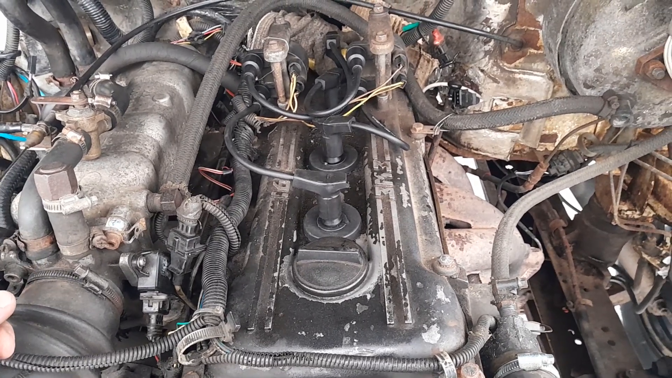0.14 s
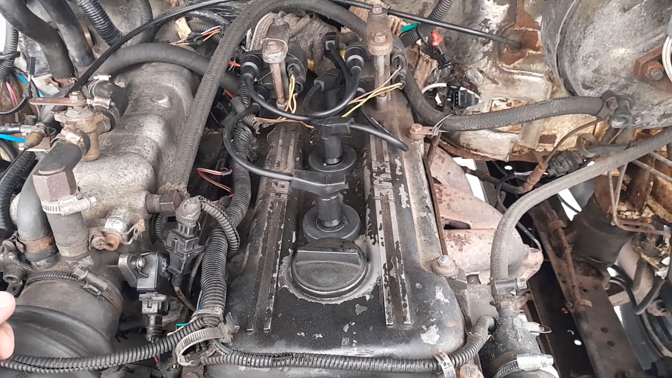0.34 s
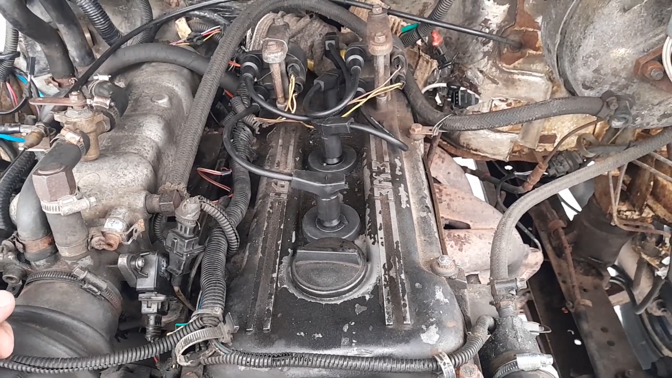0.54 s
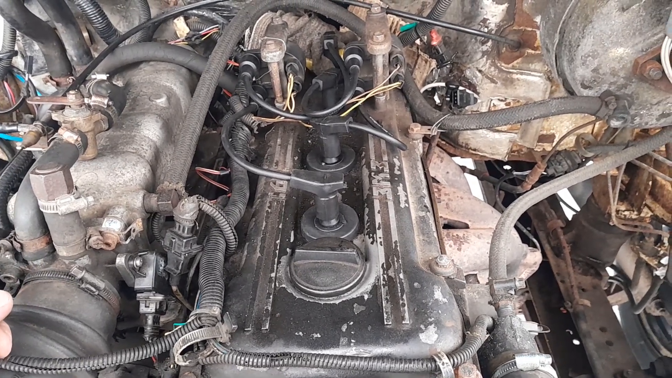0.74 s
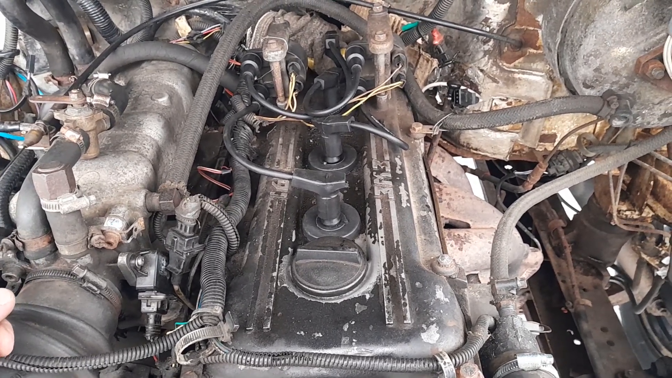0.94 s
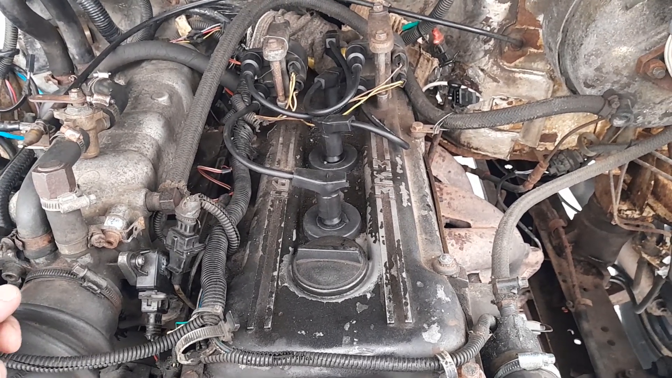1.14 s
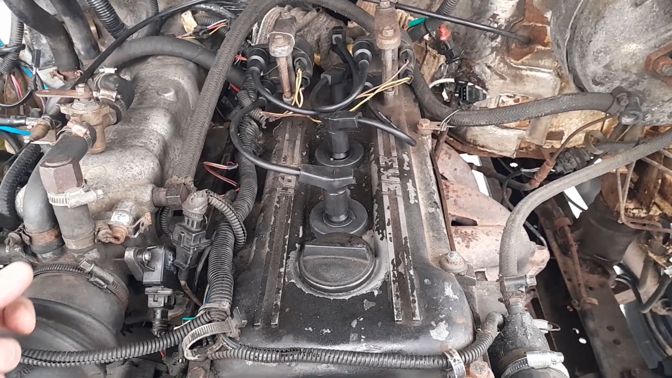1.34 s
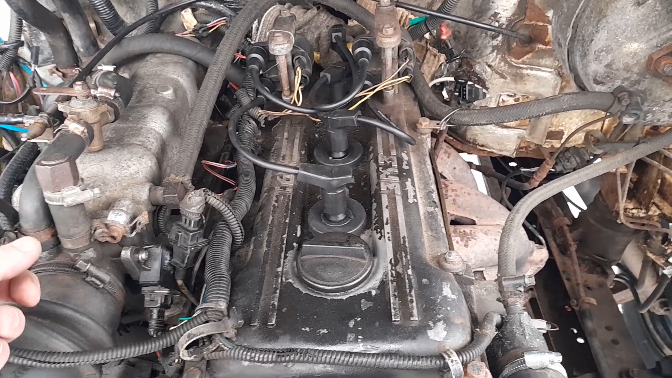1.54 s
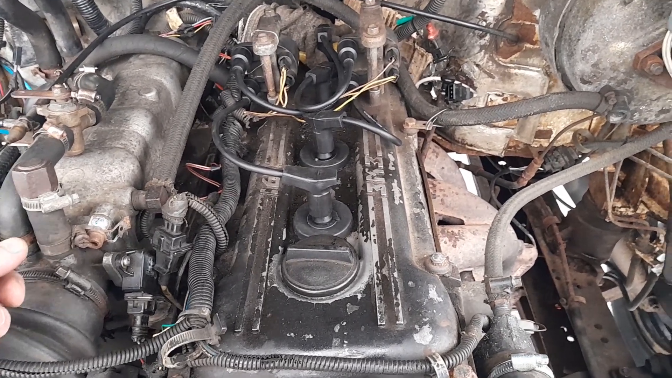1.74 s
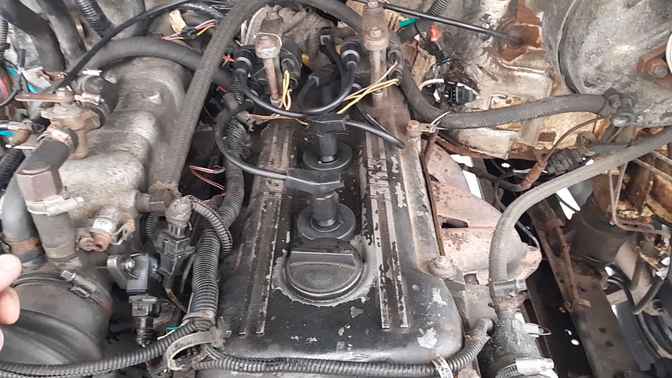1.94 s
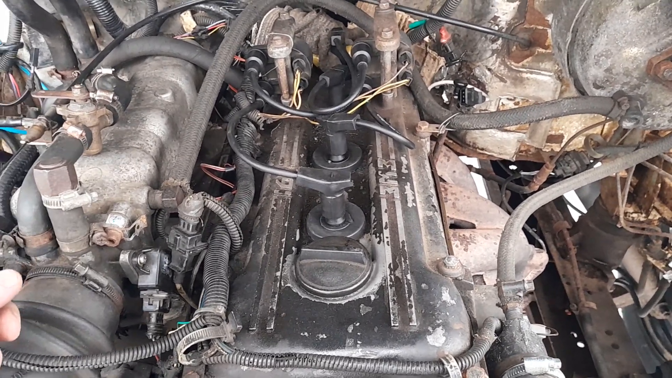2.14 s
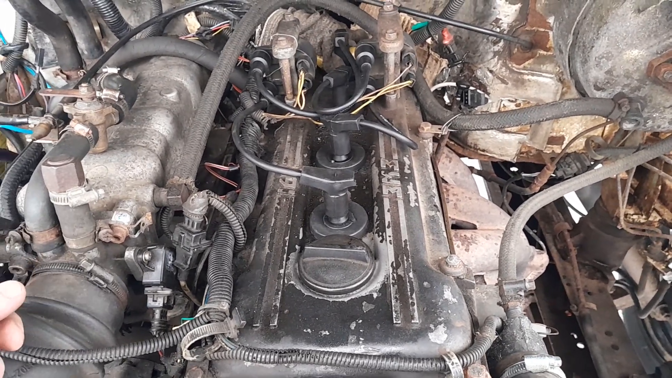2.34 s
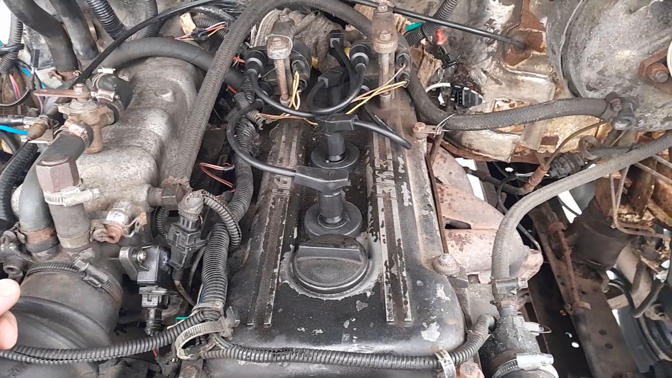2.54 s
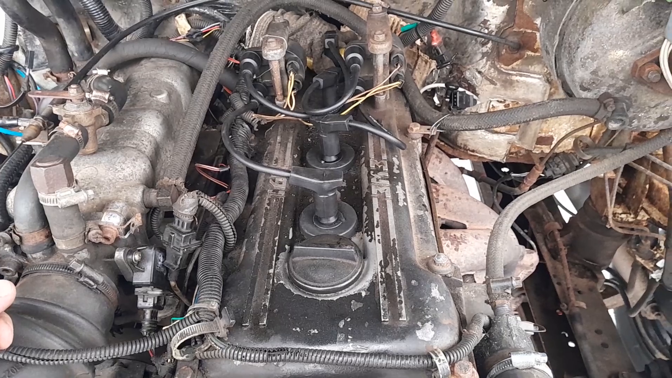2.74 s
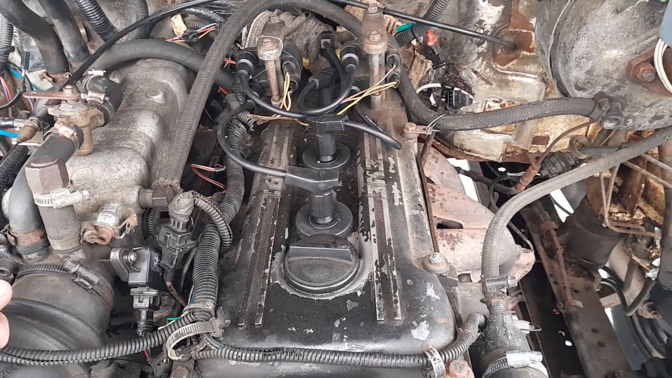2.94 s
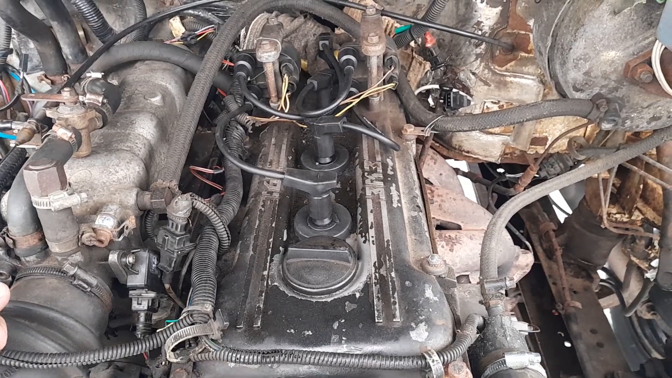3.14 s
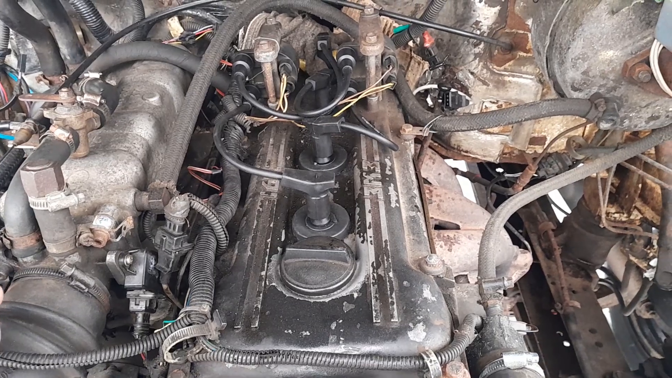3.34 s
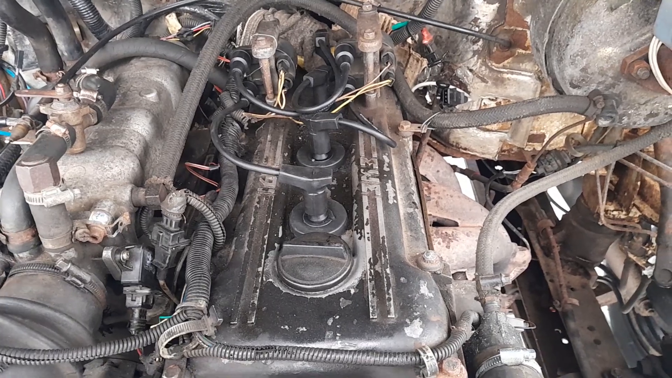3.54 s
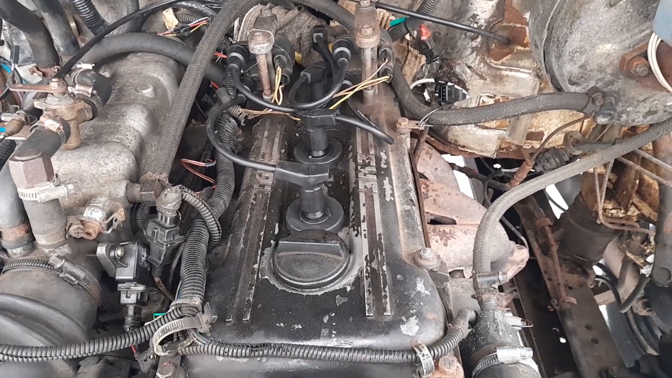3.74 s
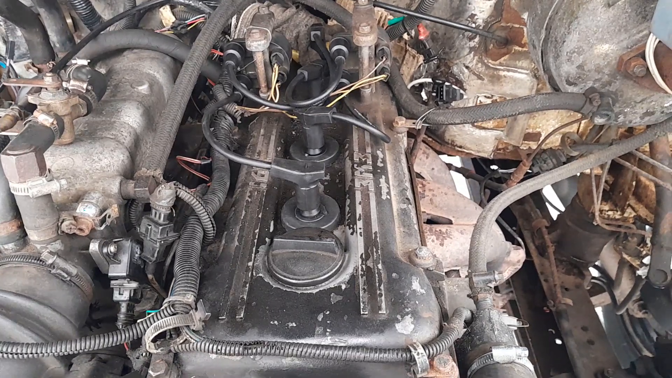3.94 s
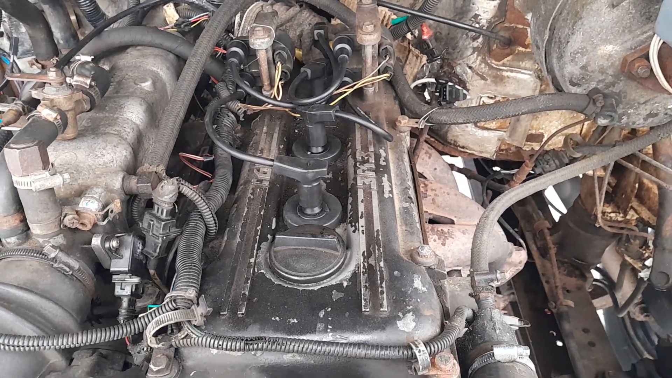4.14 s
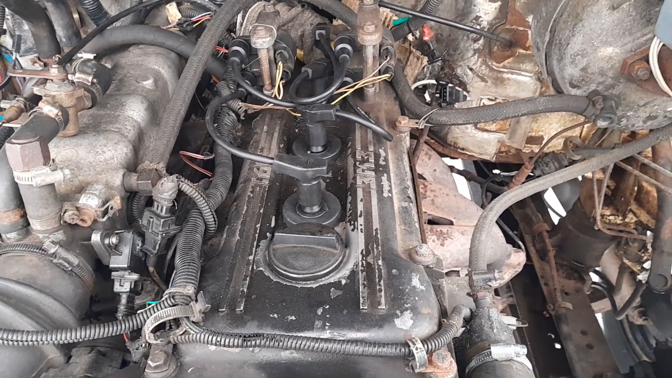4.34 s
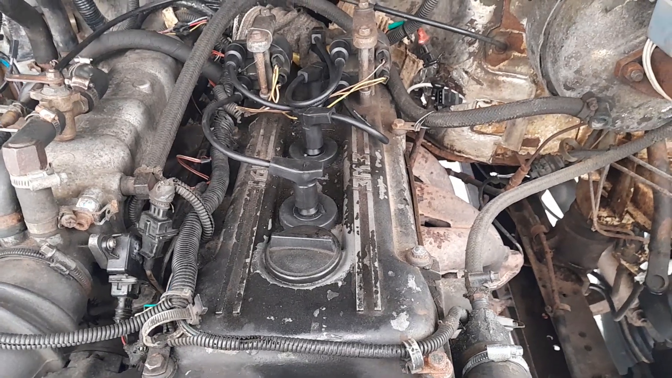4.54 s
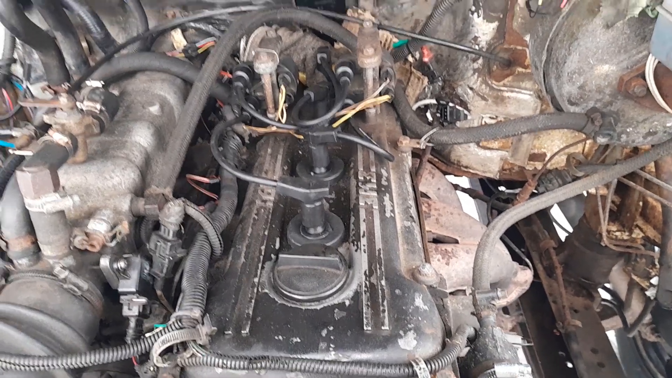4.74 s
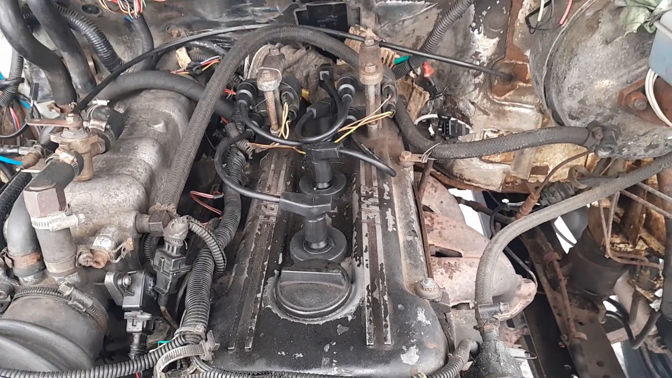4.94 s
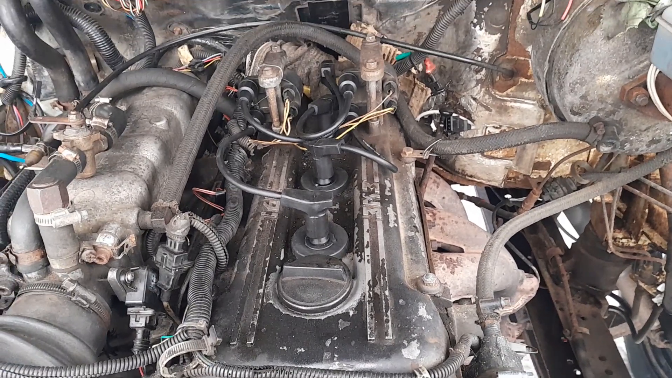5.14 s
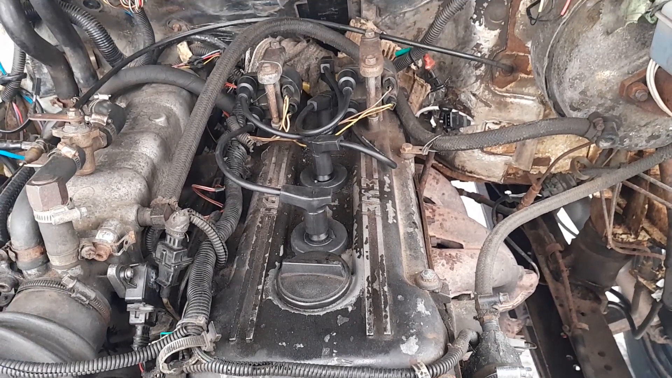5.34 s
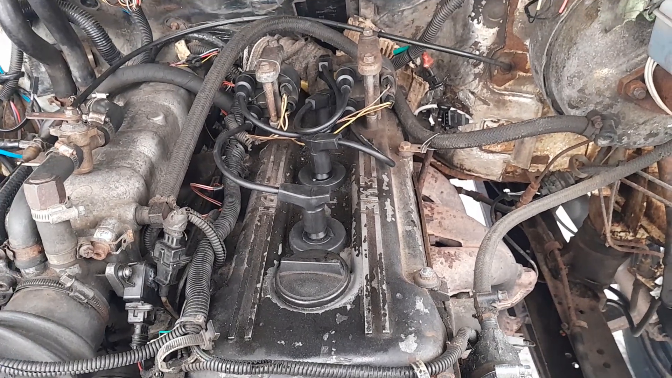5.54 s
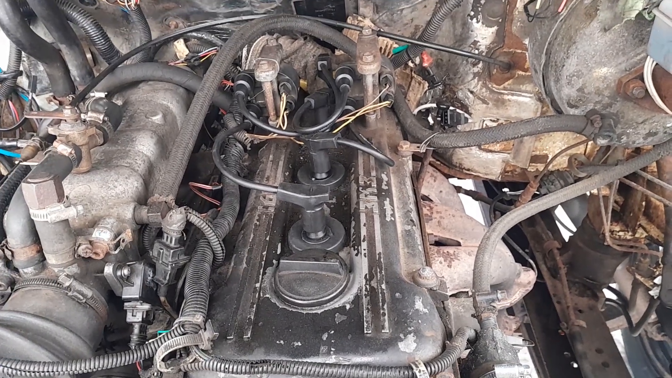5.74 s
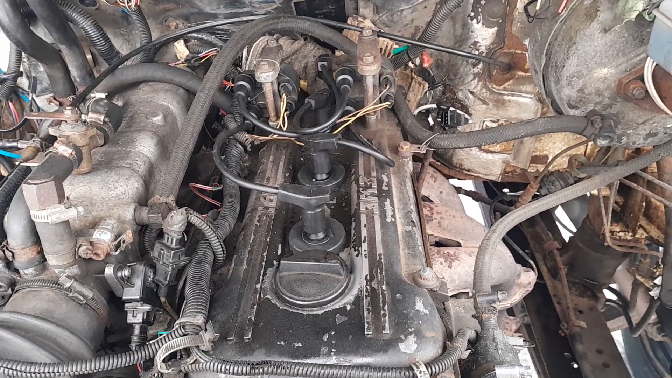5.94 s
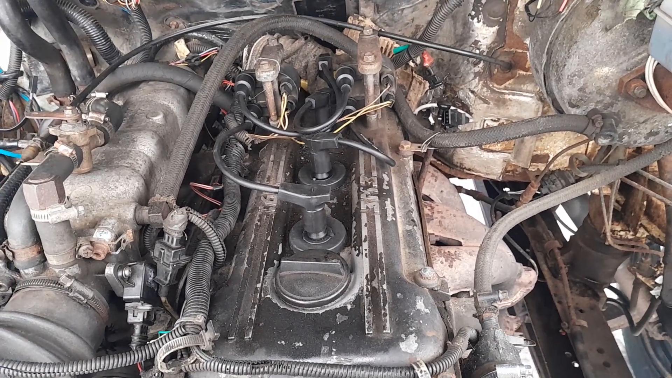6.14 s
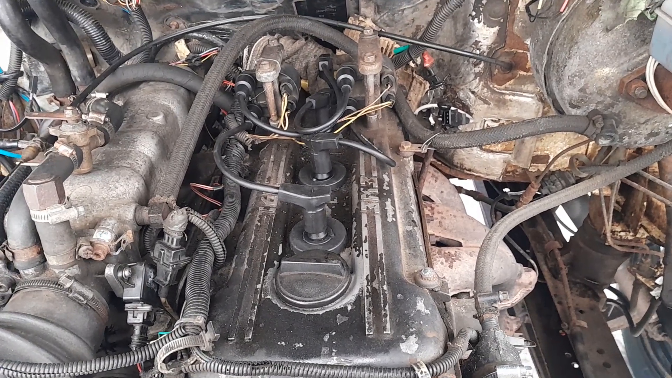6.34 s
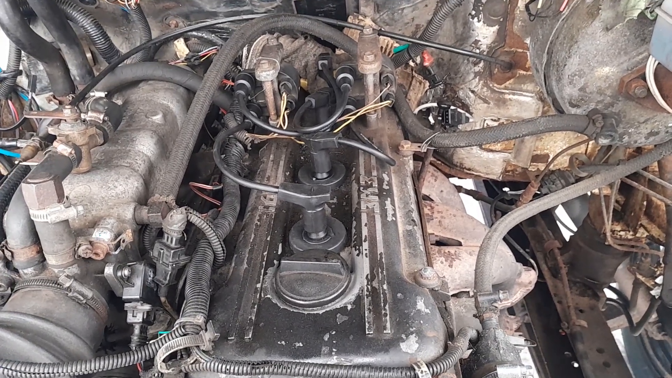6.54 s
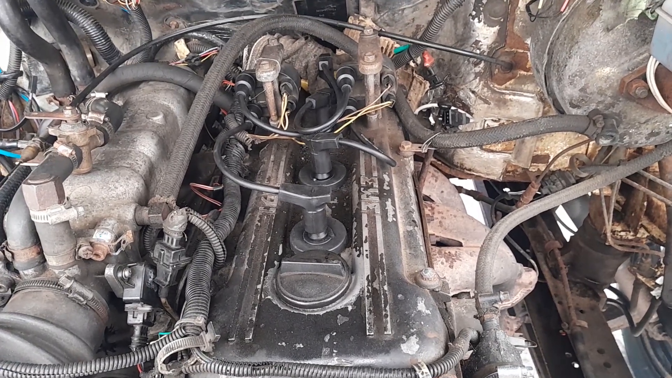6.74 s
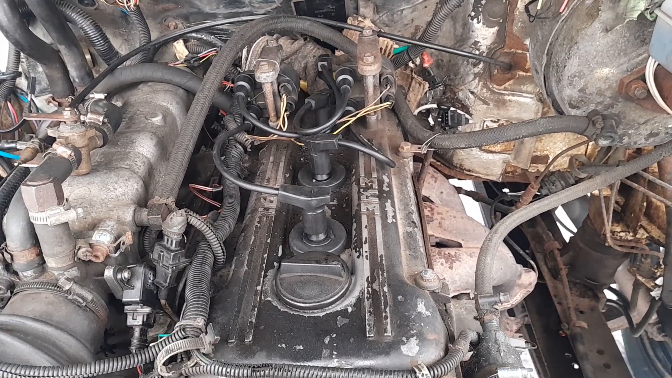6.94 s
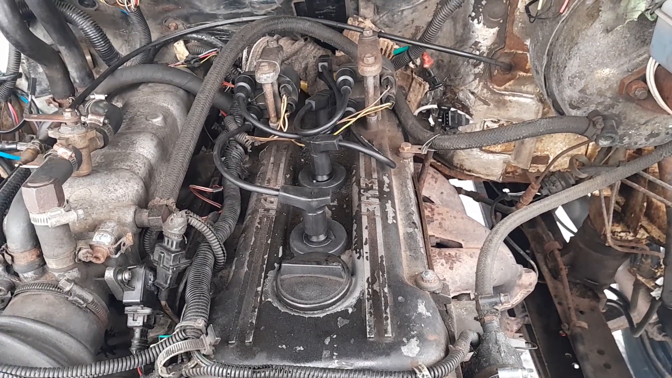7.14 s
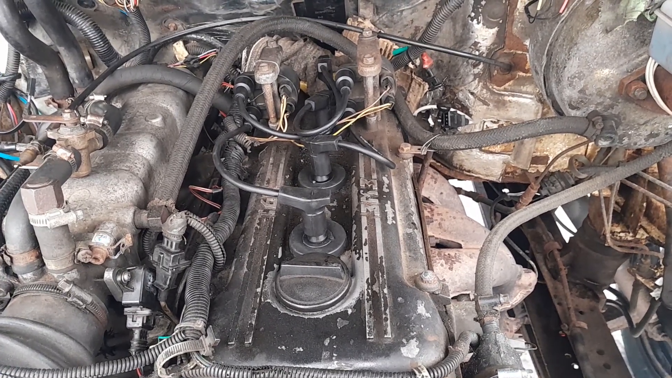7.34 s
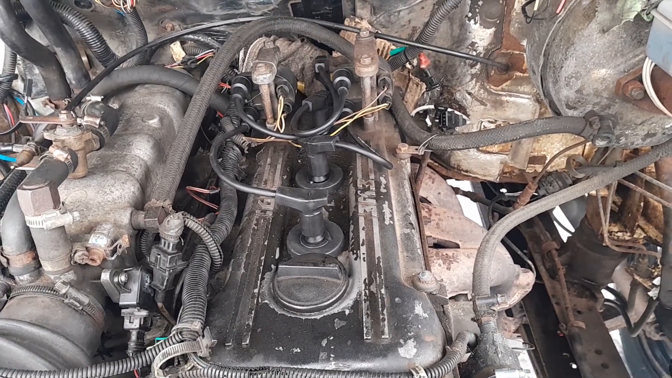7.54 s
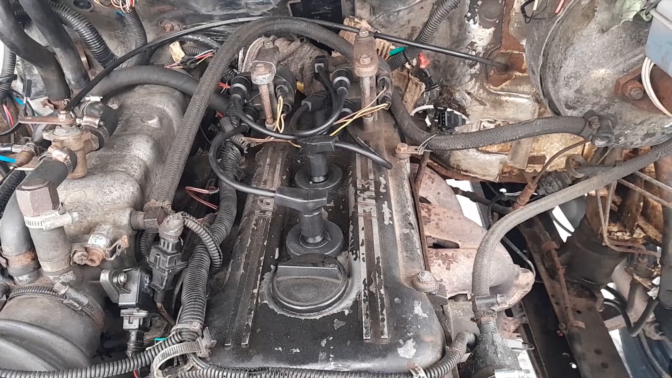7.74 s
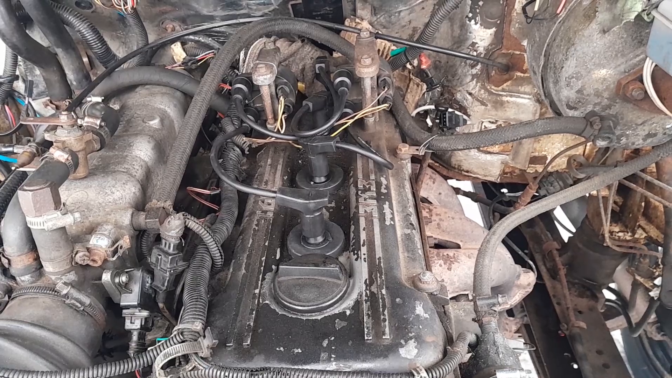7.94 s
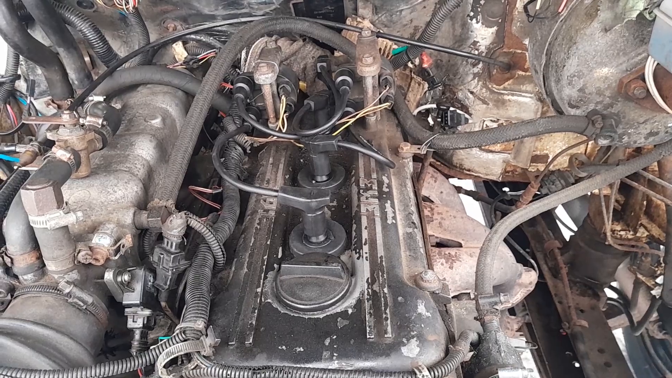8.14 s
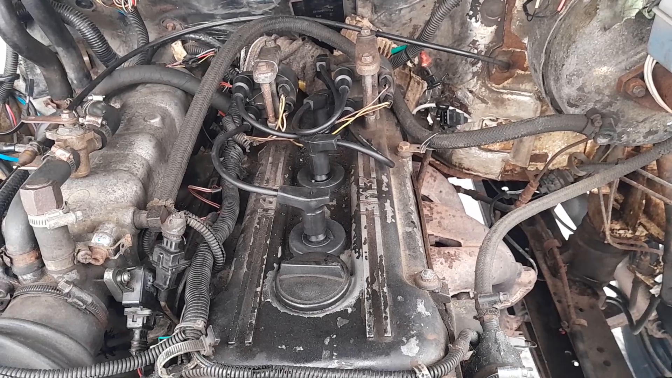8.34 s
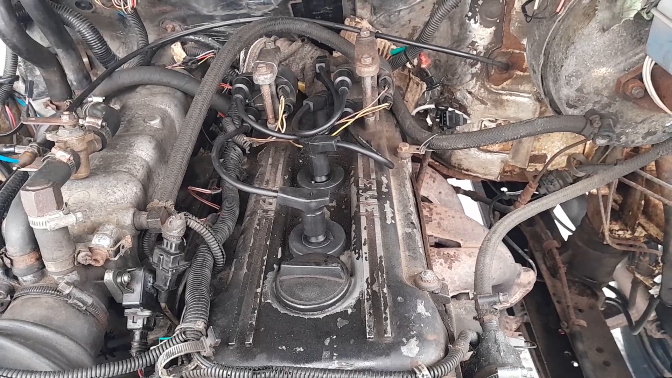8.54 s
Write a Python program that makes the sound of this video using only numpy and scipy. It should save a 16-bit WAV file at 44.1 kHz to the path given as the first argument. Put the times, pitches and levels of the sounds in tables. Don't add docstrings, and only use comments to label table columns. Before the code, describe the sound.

Open-bay petrol engine: falling revs with soft pipe pops, one booming throttle blip, a crackling run-down, then a close, rattly steady idle.

```python
import sys
import numpy as np
from scipy import signal
from scipy.fft import rfft, irfft, next_fast_len
from scipy.io import wavfile
from scipy.ndimage import uniform_filter1d, map_coordinates

SR = 44100
rng = np.random.default_rng(int(sys.argv[2]) if len(sys.argv) > 2 else 0)


def unload_audio(sound):
    columns = np.transpose(np.atleast_2d(sound))
    steps = np.round(np.clip(columns, -1, 1) * 32767)
    wavfile.write(sys.argv[1], SR, steps.astype(np.int16))


def nominal_scale(level):
    x = np.asarray(level, float) / 20
    return 10 ** x


N = 382347

# time in seconds, firings per second.
SPEED = [(0.0, 88.35), (0.412, 71.15), (1.083, 48.36), (1.372, 41.38), (1.512, 35.71), (1.63, 41.16),
         (1.775, 56.29), (2.025, 98.12), (2.211, 123.13), (2.637, 106.18), (2.955, 89.86), (3.086, 87.24),
         (3.303, 76.9), (3.894, 56.28), (4.645, 33.99), (5.249, 31.07), (5.915, 31.67), (8.67, 31.41)]
# time in seconds, throttle opening 0-1, share of cylinders firing steadily 0-1.
THROTTLE = [
    (0, 0, 0.1),
    (1.42, 0.1, 0.17),
    (1.62, 0.45, 0.15),
    (1.78, 1, 0.97),
    (2.09, 0.5, 0.7),
    (2.17, 0, 0.2),
    (4.48, 0.14, 0.17),
    (4.64, 0, 0.75),
    (8.67, 0.15, 0.88),
]
# time in seconds, level in dB.
BURN = [(0, -25.5), (.72, -25.5), (.9, -25), (1.0, -16.5), (1.2, -16.5), (1.38, -24), (1.55, -11.5),
        (1.66, -2), (1.76, -0.5), (2.07, -0.5), (2.13, -18), (3.8, -27.5), (4.02, -11), (4.5, -23.5),
        (4.66, -22), (5.45, -5.5), (5.92, -3.5), (8.67, -4.5)]
# time in seconds, depth 0-1 of cylinder differences, share of half orders from a lazy pair.
UNEVEN = [(0, 0.05, .02), (1.9, 0.02, .02), (2.2, 0.1, .04), (2.33, 0.3, .07), (2.6, 0.2, .07),
          (2.72, 0, .03), (4, 0.28, .02), (4.6, 0.15, .02), (5.3, 0.28, .02), (8.67, 0.2, .02)]
CYLINDERS = [-1.4, -.2, .8, .8]
# frequency in Hz, width in Hz, level in dB.
PIPE = [(58, 30, -7), (86, 22, 0)]
# frequency in Hz, gain in dB.
TAILPIPE = [(31, -59), (42, -37), (52, -24), (62, -17), (112, -12), (145, -21.5), (205, -24.5), (245, -38)]
# firing order, level in dB relative to the third.
SNAP = [(4, -20), (5, -20), (6, -26.5), (7, -32)]
# time in seconds, half length in seconds, first-order drop in dB, higher-order flare in dB.
STUMBLES = [(0.0, 0.013, 8.5, 24), (0.17, 0.12, -4, -15), (0.27, 0.021, 18, 6), (0.572, 0.037, 25, 26),
            (0.76, 0.11, -4.5, 3), (0.83, 0.035, 6, -7), (0.965, .04, 12, -2), (1.198, 0.022, -5, -9),
            (1.246, 0.032, 26, -7), (1.29, 0.11, 2, 14), (1.39, 0.033, 3, -8), (1.47, 0.032, 3, -6),
            (1.55, .025, 3, -7), (1.68, 0.17, 21, 2), (1.791, 0.036, -2, -16), (1.9, 0.051, 5, -2),
            (2.19, 0.046, 10, -4), (2.845, 0.014, 15, -2), (2.93, 0.2, 4.5, -8), (3.19, 0.047, -1, 14),
            (3.24, 0.052, 2, -5.5), (3.535, 0.031, 28, 20), (3.76, 0.028, 3, 10), (3.88, .05, 1, -2),
            (3.92, .05, -1, -6), (3.968, 0.071, 8, -14), (4.034, 0.033, 24, -6), (4.09, 0.061, -4, -1.5),
            (4.189, 0.065, 2, -18), (4.234, 0.028, -1, 17), (4.3, 0.06, 13, 8), (4.335, 0.034, 7, 5.5),
            (4.357, 0.018, 16, 0), (4.422, 0.018, 4, 14.5), (4.56, 0.042, 7, 3), (4.66, .04, 0.5, 4),
            (4.72, .03, 0.5, -2), (4.8, .05, 0.5, 3.5), (4.87, .035, 0.5, -7), (5.46, 0.022, 0.5, 2.5),
            (2.335, 0.012, -2.5, 1), (2.375, 0.0088, 0, 1), (2.41, 0.0086, 7, 5), (2.445, 0.014, 3, 3),
            (2.545, 0.0092, 4, 1)]
# start in seconds, peak in dB, frequency in Hz.
POPS = [(0.002, -20.5, 139), (0.227, -7, 89.6), (0.538, -19, 142.3), (0.797, -14, 86), (0.919, -18.5, 87.4),
        (1, -17, 86), (1.086, -20, 108), (1.755, -27.5, 309), (1.935, -26.5, 294), (2.839, -8.5, 82.4),
        (2.869, -8.5, 83.5), (3.174, -9.5, 94), (3.501, -18, 90), (3.741, -12.5, 84.7),
        (3.984, -17.5, 82.6), (4.087, -29, 104), (4.233, -40, 99), (4.408, -35, 84.5), (4.62, -22.5, 87),
        (4.77, -29, 142), (4.789, -35, 172)]
# frequency in Hz, level in dB.
SHELL = [(110, -65), (150, -39.5), (200, -37.5), (230, -47.5), (260, -48.5), (300, -51), (345, -47),
         (440, -61.5), (520, -40), (575, -38), (640, -51)]
# time in seconds, half length in seconds, rise in dB.
SINGS = [
    [(.13, 0.13, 6.5), (.45, .15, 5), (1.35, .2, -11), (2.35, .2, -12), (2.75, 0.17, -8), (3.1, 0.12, 10.5), (3.6, 0.15, 3), (3.85, .06, -6), (4.0, .15, 3), (4.5, .3, -8)],
    [(.3, .1, 4), (1.0, 0.096, 7), (1.35, 0.22, -17), (1.93, .1, 5), (3.3, 0.13, 11), (3.75, .15, -8), (4.07, 0.11, 4.5), (4.5, 0.32, -10)],
    [(.55, .1, -1), (1.35, 0.22, -8), (2.33, .2, 3), (2.7, .15, -5), (3.5, .15, 11), (4.45, 0.31, -6)],
    [(.7, .1, 3), (1.35, .25, -8), (2.0, .1, 0), (3.03, 0.26, 5), (3.75, .1, 4), (4.45, .35, -12)],
]
# time in seconds, place (0 first, 1 second).
PLACE = [
    (0, 0.01),
    (4.3, 0.031),
    (4.9, 1),
    (5.6, 0.99),
    (8.67, 0.91),
]
# time in seconds, gain from nearness in dB.
NEAR = [(0, 0), (4.3, -0.5), (5.07, 2.5), (5.35, 5), (5.65, 6), (6.1, 6.5), (8.67, 6)]
# frequency in Hz, density in dB per Hz.
RUMBLE = [
    [(76, -44), (130, -8), (215, -3.5), (242, -10), (290, -4.5), (460, -11.5), (651, -4), (717, -7.5), (817, -11.5), (900, -38), (1170, -36), (1980, -120)],
    [(76, -17), (130, -13), (146, -7), (237, -15.5), (335, -13), (486, -17.5), (712, -12.5), (900, -34), (1170, -46), (1980, -120)],
]
# frequency in Hz, density in dB per Hz.
CLATTER = [
    [(470, -25), (800, -10.5), (910, -12.5), (1070, -3), (1150, -5.5), (1240, -2), (1500, -5.5), (1600, -2), (1690, -0.5), (1900, -4), (2650, -6), (3080, -8), (4400, -23.5), (5720, -22), (9680, -120)],
    [(470, -43), (800, -9.5), (847, -9), (910, -20), (1090, -7.5), (1230, -7), (1360, -8), (1740, -2.5), (1880, -6.5), (2070, -2.5), (2300, -10.5), (3060, -9.5), (3330, -13), (4400, -27), (5720, -49), (9680, -120)],
]
# frequency in Hz, width in Hz, level in dB.
COVERS = [(1091, 21, -5.5), (1220, 21, -1.5), (1690, 36, -5), (2603, 24, 1.5), (3250, 19, -21)]
# frequency in Hz, width in Hz, level in dB.
CAPS = [(1737, 34, -4), (2440, 76, -3), (2845, 79, -4), (3264, 39, 3), (3640, 90, 3)]
# frequency in Hz, width in Hz, level in dB.
HEAD = [(1710, 260, 0), (2600, 350, -4)]
# time in seconds, half length in seconds, rises in dB of rumble, cover ring and clatter.
SHAKES = [(0.0, 0.076, 2, 16, 4.5), (0.24, 0.1, 7.5, 19, 2.5), (0.563, 0.14, 3, 17.5, 0),
          (0.846, 0.68, 1, 9.5, 0), (0.955, .05, 1, 6, 0.5), (1.5, 0.33, -2, -21, -1.5),
          (1.783, 0.072, 3, -2, 0.5), (2.45, 0.37, -1.5, 8, 1.5), (1.954, 0.1, -1, -4, 2.5),
          (2.077, 0.1, -1.5, 2, -2.5), (2.187, 0.051, 2.5, 16, 1), (2.4, 0.12, 1, -2, 0),
          (2.72, .12, -1.5, 7, 1), (2.85, 0.061, 5, -4, 1), (2.96, 0.15, -3.5, 24, 1),
          (3.107, 0.33, 2, -8, -1.5), (3.165, 0.046, -2, -3, 1), (3.536, 0.28, 3, 15, 0.5),
          (3.86, 0.16, 2, 7, -1.5), (4.37, 0.074, -5, -14, -0.5), (5.327, 0.081, 0.5, 4, -1.5),
          (5.8, 0.18, 3, 2, 1.5), (6.058, 0.076, 3, 7, -1.5), (8.437, 0.09, 0, 4, 1.5)]
# frequency in Hz, density in dB per Hz.
HISS = [
    [(2240, -18.5), (3800, -7.5), (7710, -8.5), (8990, -17.5), (12000, -18.5), (15600, -42), (22000, -120)],
    [(2240, 7), (3800, 6), (4330, 7), (4650, 8), (7070, 7), (7930, 12), (8410, 6.5), (9340, -1.5), (11700, -1), (12000, 2.5), (15600, -8), (22000, -120)],
]
# frequency in Hz, density in dB per Hz.
WHISTLE = [
    [(8000, -40), (9500, -3), (13500, 0), (15100, 0), (15900, -6)],
    [(8000, -40), (9500, -10), (12100, -9), (12500, -1), (12800, 1), (13300, -4), (13550, -2), (14000, -5), (14400, -4), (14800, -7), (15400, -5), (15900, -7)],
]
# time in seconds, half length in seconds, hiss rise in dB, whistle rise in dB.
GULPS = [(0.22, 0.059, 2.5, 5), (1.42, .05, 2, 3), (1.52, 0.065, 2, 6), (1.62, 0.015, 5.5, -1),
         (1.975, 0.058, 3, 10), (2.06, 0.16, -2.5, -6), (2.25, 0.13, 0.5, -4), (2.88, .06, 1, 5),
         (3.43, 0.083, 1.5, 6), (4.1, 0.045, 2, 1), (4.18, 0.017, 6, -4), (4.47, .015, -1, 7),
         (4.6, 0.42, 2, -1), (5.7, 0.034, 2.5, -5), (5.82, 0.035, 2.5, -3)]
# frequency in Hz, density in dB per Hz.
TICK = [(1500, -30), (2500, 0), (4500, 2.5), (6500, 1), (8000, 3), (10000, -5), (15800, -6), (16500, -40)]
# frequency in Hz, level in dB.
WHINE = [(300, -52), (450, -56), (740, -58), (790, -45), (870, -45), (920, -58), (1270, -39), (1450, -47)]
# dB at 60 firings/s, dB per 60 more, dB at open throttle, share of the nearness.
RUMBLE_LAW = (-43, 9, 10.5, 1)
RING_LAW = (-51, 6, -6, 1.54)
CLATTER_LAW = (-32.5, 5, 3.5, 1.26)
HISS_LAW = (-45.5, 6, 4.5, 1.44)
WHISTLE_LAW = (-49.5, 6.5, 9, 2.2)
# frequency in Hz, left-right likeness 0-1.
ALIKE = [(130, 1), (300, .83), (410, .45), (520, .8), (680, .77), (850, .35), (1400, .5), (2200, .4),
         (3500, .25), (5600, .1), (9000, .2), (13000, .4)]
# frequency in Hz, dB by which left is louder.
LEFT = [
    [(60, 1.5), (180, 1.5), (450, .5), (740, 3), (1150, 0), (1700, -2), (3400, 1.5), (7200, -1.5), (10400, 2), (15000, 1)],
    [(60, 1.5), (180, 1.5), (400, 0), (790, 5), (1150, 3), (1700, 4.5), (3400, 5), (5200, -1), (7000, 0), (8200, 4.5), (9500, 5.5), (15000, 3)],
]
# frequency in Hz, radians by which left leads.
LEAD = [(0, 0), (1030, 0.2), (1380, 1.4), (2070, 0.3), (3100, 3.2), (3790, 7.8), (4130, 14.5), (6460, 24.0),
        (7320, 33.6), (8440, 40.9), (11300, 40.1), (12500, 42.9), (13100, 43.4), (16600, 52.5)]


def unit(x):
    return x / np.sqrt(np.mean(x ** 2) + 1e-20)


def along(points, hz):
    f, v = np.transpose(points)
    return np.interp(np.log(hz + 1), np.log(f + 1), v)


def curves(rows):
    s, *cols = np.transpose(rows)
    return [np.interp(np.arange(N) / SR, s, c) for c in cols]


def swells(rows):
    s, half, *cols = np.transpose(rows)
    hop = 32
    t = np.arange(0, N, hop)[:, None] / SR
    shape = np.clip(1 - abs(t - s) / half, 0, 1)
    return [np.repeat(shape @ c, hop)[:N] for c in cols]


def wobble(rate_hz):
    knots = rng.standard_normal(int(N * rate_hz / SR) + 4)
    return map_coordinates(knots, [np.arange(N) * rate_hz / SR])


def filtered(x, response):
    m = next_fast_len(N + SR // 2)
    return irfft(rfft(x, m) * response(np.fft.rfftfreq(m, 1 / SR)), m)[..., :N]


def resonances(modes):
    return lambda f: sum(nominal_scale(db) * 1j * f * w / (c * c - f * f + 1j * f * w) for c, w, db in modes)


def noise_through(response):
    return unit(filtered(rng.standard_normal(N), response))


def rush(gain):
    def mid_side(hz):
        turn = np.arccos(np.clip(along(ALIKE, hz), -1, 1)) / 2
        return gain(hz) * [np.cos(turn), np.sin(turn)]
    mid, side = filtered(rng.standard_normal((2, N)), mid_side)
    return unit(np.array([mid + side, mid - side]))


def placed(spectra, extra=(lambda hz: 1,) * 2, late_s=0):
    share = np.clip(curves(np.add(PLACE, [late_s, 0]))[0], 0, 1)
    first, second = (rush(lambda hz: nominal_scale(along(s, hz)) * more(hz)) for s, more in zip(spectra, extra))
    return np.sqrt(1 - share) * first + np.sqrt(share) * second


def bursts(count, sizes, scatter_db, t60):
    step = np.floor(count).astype(int)
    scatter = nominal_scale(scatter_db * rng.standard_normal(step[-1] + 1))
    size = np.resize(sizes, step[-1] + 1) * scatter
    kicks = np.diff(step, prepend=step[0]) * size[step]
    return signal.lfilter([1], [1, -nominal_scale(-60 / (t60 * SR))], kicks)


def level(law):
    base_db, faster_db, open_db, share = law
    faster = curves(SPEED)[0] / 60 - 1
    return base_db + faster_db * faster + open_db * curves(THROTTLE)[0] + share * curves(NEAR)[0]


def boom():
    load_db, third_over_second_db, coast_db, ragged_db = 8.5, -0.5, -18.5, 2.5
    rebound_db, rebound_s = 1, 0.082
    speed_hz, = curves(SPEED)
    opening, steady = curves(THROTTLE)
    drop_db, flare_db = swells(STUMBLES)
    keep = np.exp(-1 / (rebound_s * SR))
    lagged_db = signal.lfilter([1 - keep], [1, -keep], np.clip(drop_db, 0, 10))
    first_db = load_db * opening - drop_db + rebound_db * np.tanh(lagged_db)
    burn_db = curves(BURN)[0] + flare_db + ragged_db * (1 - steady) * wobble(18)
    third_db = burn_db + third_over_second_db + coast_db * (1 - steady)
    sources_db = [first_db, burn_db, third_db]
    return [along(TAILPIPE, k * speed_hz) + db for k, db in enumerate(sources_db, 1)]


def exhaust(firings):
    snap_rad = 2.53
    first, second, third = (nominal_scale(db) for db in boom())
    depth, lope = curves(UNEVEN)
    angle = 2 * np.pi * (firings + .375)
    low = first * np.sin(angle) + second * np.sin(2 * angle) + third * np.sin(3 * angle)
    high = -third * sum(nominal_scale(db) * np.cos(k * (angle + snap_rad)) for k, db in SNAP)
    halves = lope * first * (np.sin(angle / 2) + 0.39 * np.sin(3 * angle / 2))
    step = np.floor(firings + .33).astype(int)
    strength = np.resize(CYLINDERS, step[-1] + 1) + .35 * rng.standard_normal(step[-1] + 1)
    uneven = depth * uniform_filter1d(strength[step], size=200)
    quarters = filtered(uneven * low, resonances(PIPE))
    return np.sqrt(2) * (low + high * (1 + 0.67 * uneven) + halves + quarters)


def pops():
    puff_db, puff_t60_s, thump_t60_s, rise_s = -14, .09, 0.27, 0.006
    out, gate = np.zeros(N + SR), np.zeros(N + SR)
    t = np.arange(SR // 4) / SR
    for s, db, hz in POPS:
        shape = nominal_scale(db - 60 * t / thump_t60_s) * (1 - np.exp(-t / rise_s))
        angle = 2 * np.pi * hz * t
        thump = np.sin(angle) + 0.18 * np.sin(1.595 * angle) + 0.075 * np.sin(2.3 * angle)
        start = round(s * SR)
        out[start:][:len(t)] += shape * thump
        gate[start:][:len(t)] += shape * nominal_scale(puff_db - 60 * t / puff_t60_s)
    gas = noise_through(resonances([(202, 120, 1), (325, 140, -1), (510, 62, -4)]))
    return out[:N] + gate[:N] * gas


def coasting(firings):
    flicker_db, slip_rad, higher_db = 3, .8, -0.5
    faster_db, load_share = 14, 2.2
    drum_db, drum_hz, drum_width_hz = -46.5, 200, 22
    speed_hz = curves(SPEED)[0]
    opening, steady = curves(THROTTLE)
    lines = 0
    for k, sings in enumerate(SINGS, 3):
        line_db = along(SHELL, k * speed_hz) + higher_db * (k - 3) + flicker_db * wobble(12)
        angle = 2 * np.pi * k * firings + slip_rad * wobble(14)
        lines = lines + nominal_scale(line_db + swells(sings)[0]) * np.sin(angle)
    drum = noise_through(resonances([(drum_hz, drum_width_hz, 0)]))
    lines = lines + nominal_scale(drum_db + flicker_db * wobble(7.7)) * drum
    drive = np.clip(1 - steady, 0, 1) + load_share * opening
    return drive * nominal_scale(faster_db * np.minimum(speed_hz / 60 - 1, 0)) * lines


def shake():
    return [level(law) + db for law, db in zip((RUMBLE_LAW, RING_LAW, CLATTER_LAW), swells(SHAKES))]


def casting(firings):
    throb_db, knock_db = -5.5, -16
    rumble_db = shake()[0]
    rumble = nominal_scale(rumble_db + 2.5 + 0.69 * wobble(12)) * placed(RUMBLE)
    puffs = unit(bursts(firings - .06, [1, 1, 1, .5], scatter_db=2, t60=.07))
    gas = noise_through(lambda hz: resonances([(270, 180, 0)])(hz) ** 2)
    throb = nominal_scale(rumble_db + throb_db) * curves(PLACE)[0] * puffs * gas
    modes = resonances([(210, 70, 0), (330, 150, -1), (560, 300, -1)])
    blows = bursts(firings - .1, [1], scatter_db=1.5, t60=.002)
    knocks = unit(filtered(blows, lambda hz: modes(hz) * hz ** 4 / (hz ** 4 + 160 ** 4)))
    return rumble + throb + nominal_scale(rumble_db + knock_db) * knocks


def cover_ring():
    ring_hz, shadow_db = 640, 5
    angle = 2 * np.pi * ring_hz * np.arange(N) / SR + .6 * wobble(18)
    return nominal_scale(shake()[1] + 1 - shadow_db * curves(PLACE)[0]) * np.sin(angle)


def clatter(firings):
    rap_db, rap_faster_db = -7.5, 17.5
    clatter_db = shake()[2]
    gear = bursts(2 * firings + .2, [.25, .9, .1, 1, .2, .9, .5, 1.2], scatter_db=2, t60=.06)
    chain = bursts(5 * firings + .3 * wobble(30), [1], scatter_db=2, t60=.015)
    knocks = unit(1 + .75 * gear + .3 * chain)
    covers = [lambda hz, c=c: abs(1 + resonances(c)(hz)) for c in (COVERS, COVERS + CAPS)]
    metal = nominal_scale(clatter_db + 0.089 * wobble(15)) * knocks * placed(CLATTER, covers)
    blows = bursts(firings + .2, [1, .8, 1, .9], scatter_db=2.5, t60=.001)
    raps = unit(filtered(blows, lambda hz: resonances(HEAD)(hz) ** 2))
    piston_db = clatter_db + rap_db + rap_faster_db * (curves(SPEED)[0] / 120 - 1)
    return metal + nominal_scale(piston_db) * raps


def airflow():
    hiss_db, whistle_db = swells(GULPS)
    return level(HISS_LAW) + hiss_db, level(WHISTLE_LAW) + whistle_db


def patchy(x):
    patch_db = 1.1
    z = signal.stft(x, nperseg=512)[2]
    field = uniform_filter1d(rng.standard_normal(z.shape[1:]), size=4, axis=0)
    field = uniform_filter1d(field, size=20, axis=1)
    return signal.istft(z * nominal_scale(patch_db * unit(field)), nperseg=512)[1][:, :N]


def intake():
    hiss_db, whistle_db = airflow()
    draught_db = 0.16 * wobble(14)
    hiss = nominal_scale(hiss_db + 6 + draught_db) * placed(HISS, late_s=-0.25)
    whistle = nominal_scale(whistle_db - 2.5 + draught_db) * placed(WHISTLE, late_s=.25)
    return patchy(hiss + whistle)


def valves(firings):
    hiss_db = airflow()[0]
    tappet = bursts(firings + .255, [0, 0, 0, 1.15], scatter_db=1, t60=.07)
    rebound = bursts(firings + .13, [0, 0, 0, .4], scatter_db=2, t60=.03)
    ticks = bursts(firings + .19, [1.1, 1.1, 1, .6], scatter_db=2, t60=.037)
    broad = rush(lambda hz: nominal_scale(along(TICK, hz)))
    bright = rush(lambda hz: nominal_scale(along(TICK, hz)) * hz ** 4 / (hz ** 4 + 3600 ** 4))
    loose = nominal_scale(hiss_db + 5.5 + 4.5 * curves(PLACE)[0]) * (tappet + rebound) * broad
    return loose + nominal_scale(hiss_db + 4.5) * ticks * bright


def alternator(firings):
    order = 11.46
    whine_db = along(WHINE, order * curves(SPEED)[0]) + 2.5 * wobble(14)
    return nominal_scale(whine_db) * np.sin(2 * np.pi * order * firings + .5 * wobble(10))


def scene():
    firings = np.cumsum(curves(SPEED)[0]) / SR
    pipe = exhaust(firings) + pops() + coasting(firings)
    block = casting(firings) + cover_ring() + clatter(firings)
    return pipe + block + intake() + valves(firings) + alternator(firings)


def top_cut(x):
    return signal.sosfilt(signal.butter(12, 17060, fs=SR, output="sos"), x)


def record(dry):
    ceiling, top_hz = .86, 15820
    dry = dry / (1 + abs(dry / ceiling) ** 10) ** .1
    halves = [.5, -.5]

    def ports(hz, left):
        lead_rad = along(LEAD, hz) * (hz > 200) + .08 * (hz <= 200)
        return nominal_scale(np.outer(halves, along(left, hz))) * np.exp(1j * np.outer(halves, lead_rad))

    first, second = (filtered(dry, lambda hz: ports(hz, left) * (hz < top_hz)) for left in LEFT)
    share = np.clip(curves(PLACE)[0], 0, 1)
    return top_cut((1 - share) * first + share * second)


dry = scene()
out = record(dry)
unload_audio(out)
```